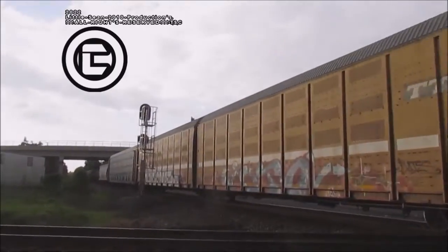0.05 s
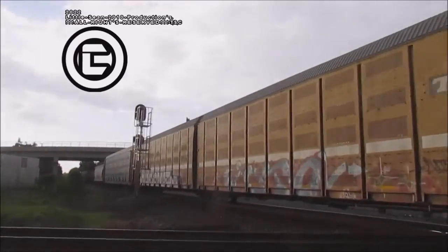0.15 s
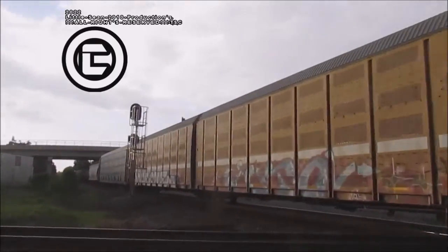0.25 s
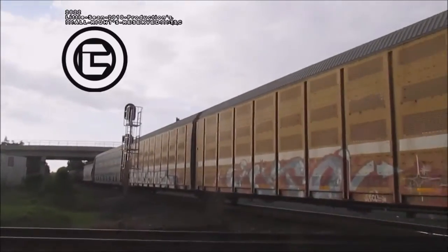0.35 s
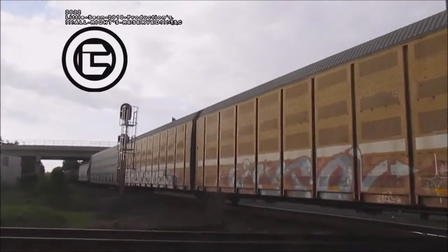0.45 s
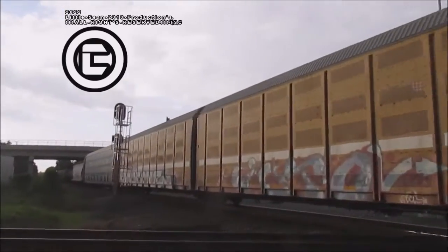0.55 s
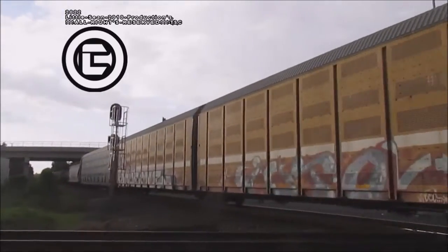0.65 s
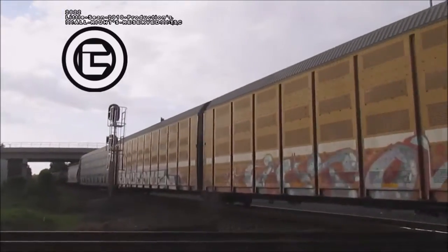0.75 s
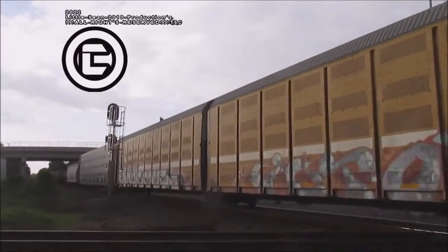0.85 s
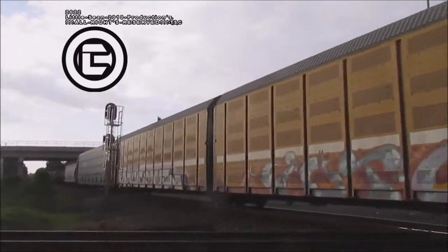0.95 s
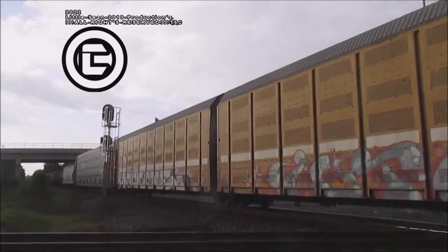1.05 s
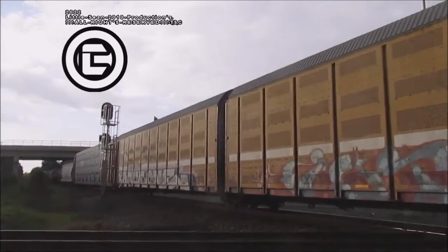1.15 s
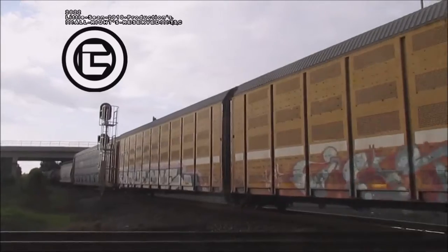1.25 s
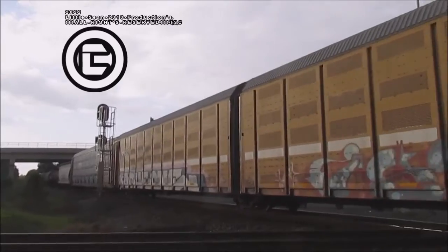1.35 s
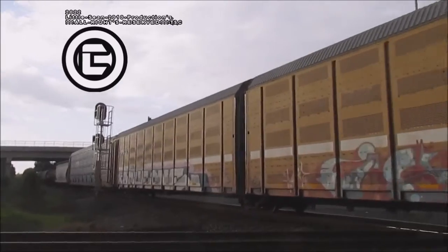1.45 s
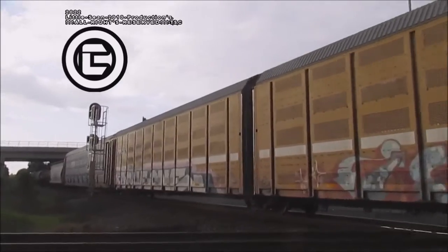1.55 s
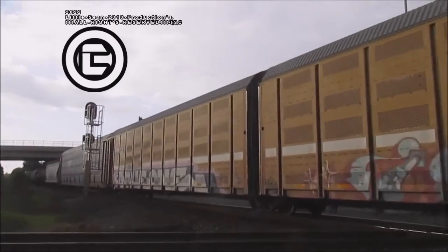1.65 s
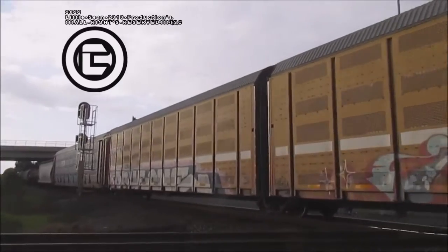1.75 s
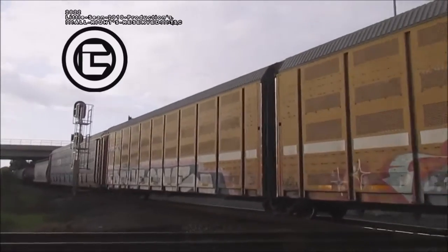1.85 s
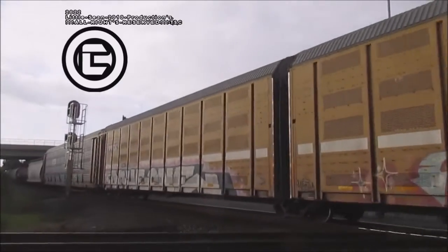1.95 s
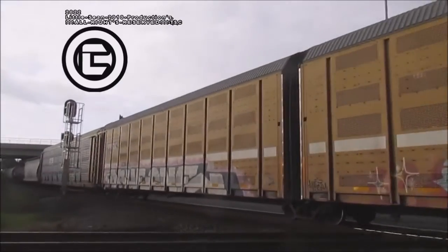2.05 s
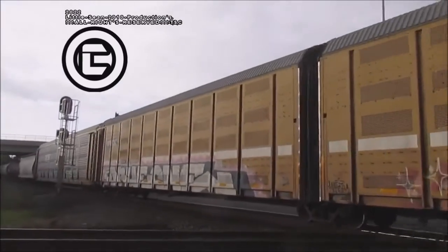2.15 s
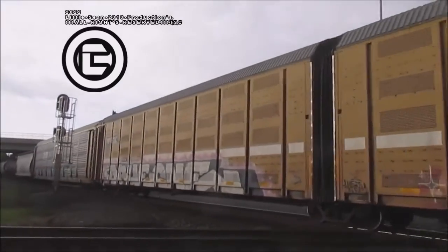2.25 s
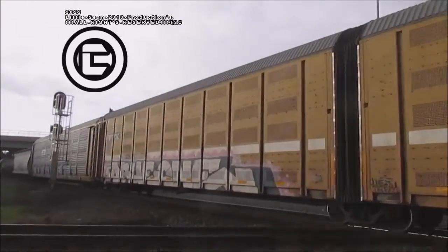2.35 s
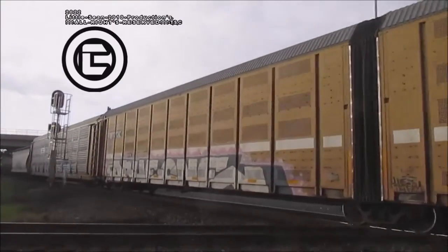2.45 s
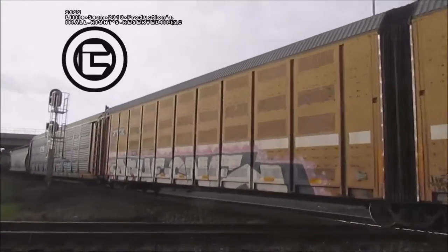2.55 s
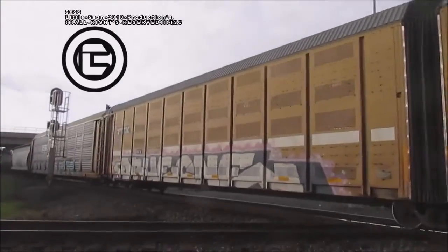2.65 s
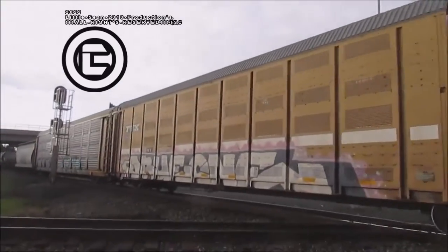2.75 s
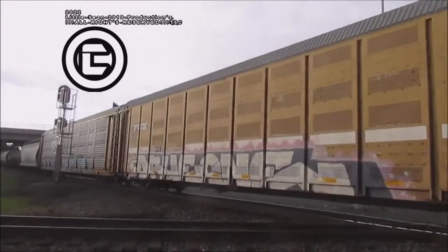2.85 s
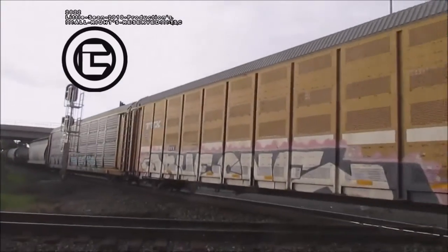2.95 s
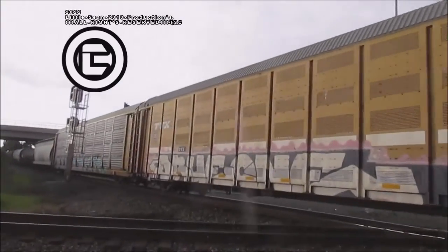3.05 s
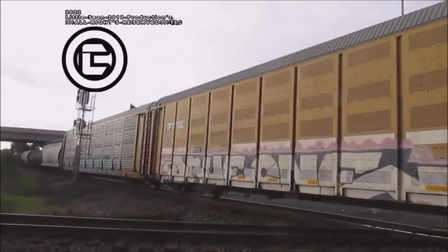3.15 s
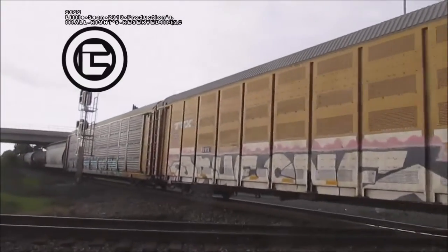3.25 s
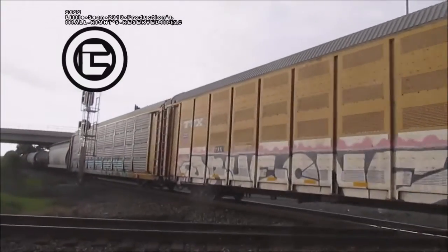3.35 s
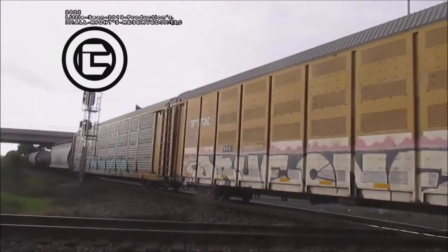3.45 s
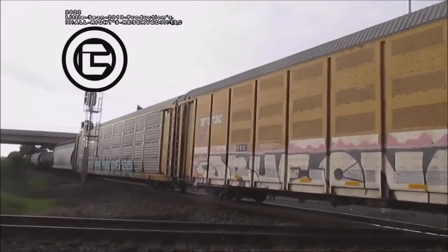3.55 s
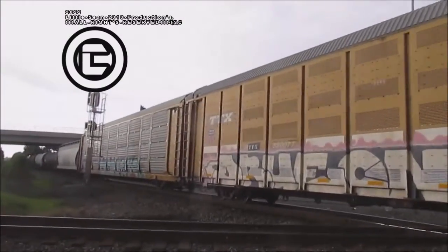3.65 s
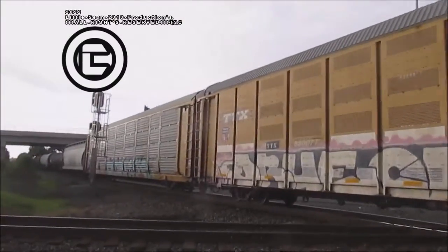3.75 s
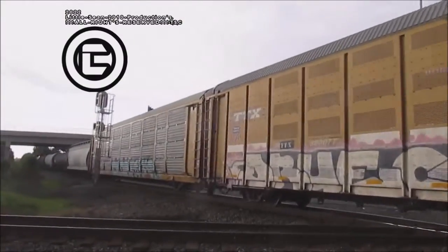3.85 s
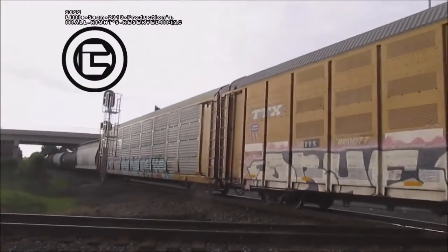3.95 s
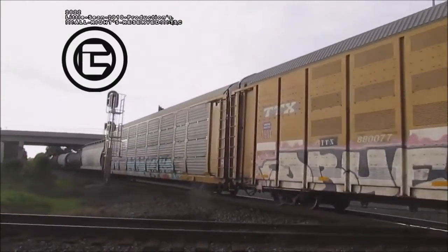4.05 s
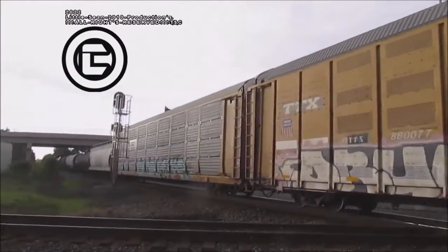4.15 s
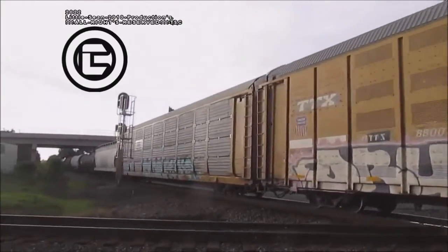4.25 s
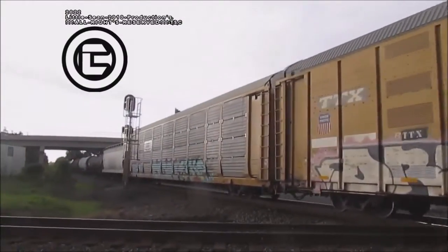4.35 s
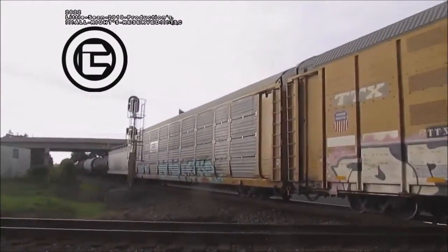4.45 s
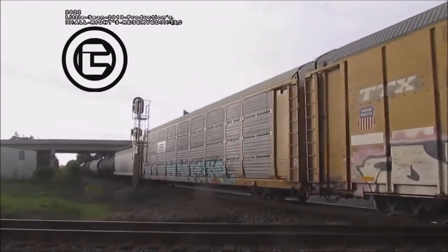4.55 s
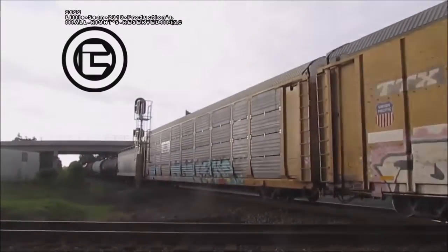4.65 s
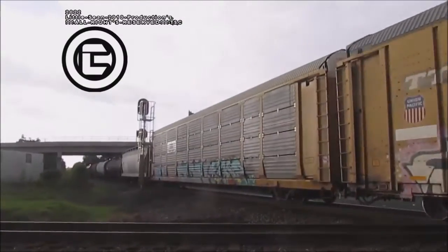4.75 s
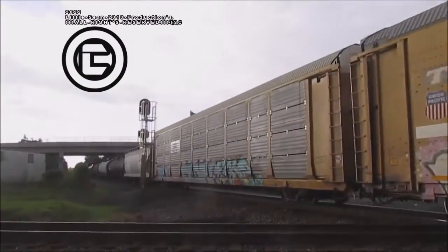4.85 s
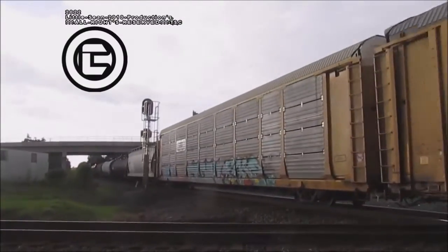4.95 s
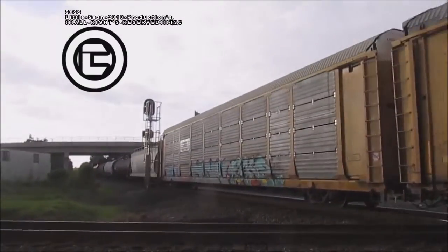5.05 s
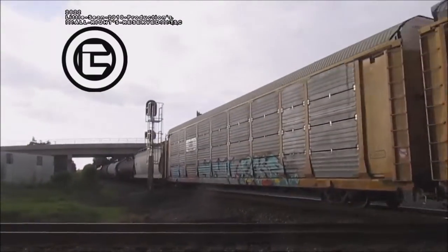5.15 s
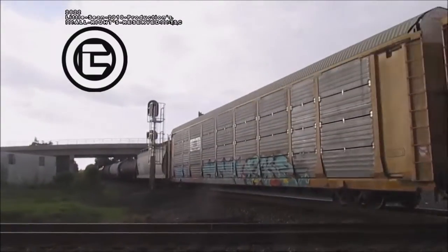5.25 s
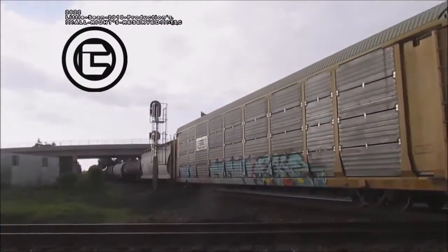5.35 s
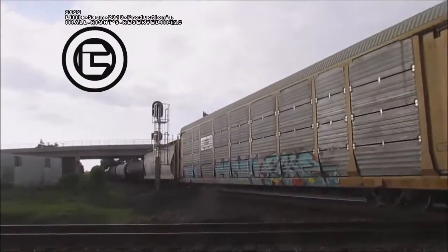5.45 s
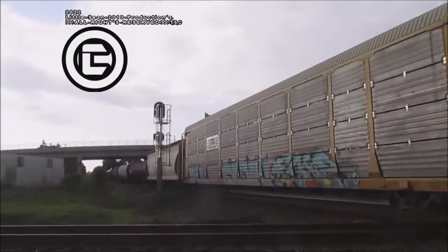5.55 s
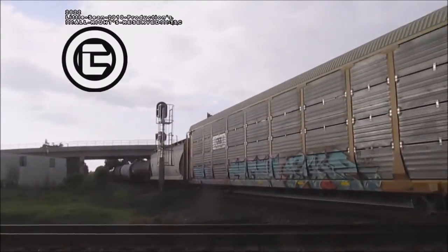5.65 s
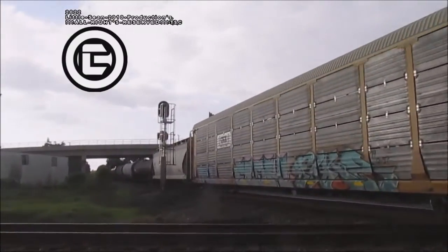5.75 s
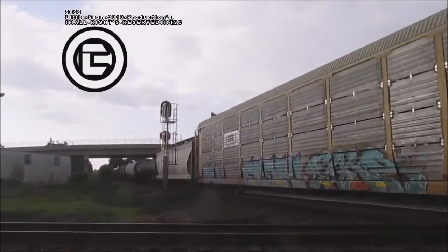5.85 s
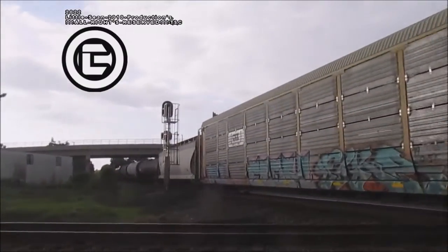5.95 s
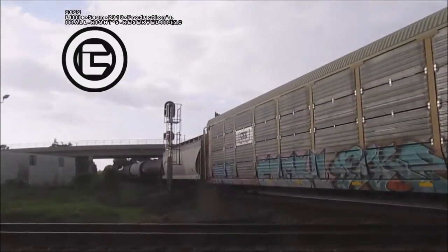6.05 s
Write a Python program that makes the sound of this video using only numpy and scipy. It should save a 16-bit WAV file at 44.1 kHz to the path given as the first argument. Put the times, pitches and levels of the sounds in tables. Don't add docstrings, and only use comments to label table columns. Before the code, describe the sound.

Outdoors beside the track, a freight train rolls past a few metres away. A dense burst of wheel bangs and steel clatter opens, drops to a soft low rumble with faint rattles, then a second burst hits, another lull, and a longer third burst that continues to the end. Thin high squeals and hiss edge the bursts. Close stereo microphone, dry, slightly overloaded, with a dull short bounce from the ballast.

```python
import sys
import numpy as np
from scipy import signal
from scipy.io import wavfile

SR = 44100
rng = np.random.default_rng(int(sys.argv[2]) if len(sys.argv) > 2 else 0)


def ratio(d):
    e = np.asarray(d, float) / 20
    return 10 ** e


def wav_out(sig):
    wavfile.write(sys.argv[1], SR, np.round(np.clip(np.atleast_2d(sig).T, -1, 1) * 32767).astype(np.int16))


N = 269010

LEFT_RIGHT = np.array([[1], [-1]])

# (frequency [Hz], density [dB per Hz])
STEEL_COLOUR = [(20, -8), (98, -1.5), (186, 0), (290, 1.5), (400, -13), (680, -6.5), (1000, -10.5),
                (1300, -14), (1600, -14), (2930, -13.5), (7000, -17.5), (10000, -9), (13000, -12.5),
                (15600, -36)]
# (time [s], clang [dB], thud [dB], rattle [dB], fizz [dB], ring time [s], rise time [s])
AXLE_BLOWS = [(0.003, -21, -8, -15, -36, 0.13, 0.006), (0.097, -12, -23, -19, -22.5, 0.34, 0.0044),
              (0.19, -13.5, -11, -11, -15, 0.26, 0.0064), (0.218, -12.5, -14, -18, -16.5, 0.24, 0.0046),
              (0.299, -15, -15, -22, -19, 0.32, 0.0055), (0.332, -9, -18, -36, -24, 0.2, 0.0039),
              (0.423, -13, -10.5, -14.5, -18.5, 0.25, 0.0032),
              (0.523, -12.5, -13.5, -16, -15, 0.26, 0.0071), (0.553, -15.5, -12.5, -37, -35, 0.22, 0.0033),
              (0.718, -45, -34, -35, -30, 0.16, 0.006), (0.879, -42, -34, -33.5, -38, 0.22, 0.006),
              (1.243, -35, -32, -50, -60, 0.23, 0.006), (1.813, -38, -28, -41, -34.5, 0.36, 0.006),
              (1.929, -54, -45, -51, -32, 0.16, 0.006), (2.049, -32, -22.5, -31.5, -38, 0.27, 0.0048),
              (2.183, -30.5, -15.5, -20, -27, 0.24, 0.0032), (2.257, -27, -19.5, -15, -21, 0.18, 0.006),
              (2.329, -12, -12.5, -11.5, -15, 0.25, 0.0033), (2.431, -14.5, -13, -18, -29, 0.29, 0.0066),
              (2.541, -11, -6, -12, -13, 0.23, 0.0077), (2.564, -9.5, -24, -30, -26, 0.27, 0.0053),
              (2.641, -10.5, -12.5, -15, -15, 0.27, 0.0047), (2.687, -15, -24, -15.5, -33, 0.23, 0.0053),
              (2.767, -13, -14, -13.5, -18, 0.24, 0.006), (2.868, -11.5, -35, -16, -30, 0.28, 0.006),
              (2.898, -20.5, -38, -18, -33, 0.45, 0.0068), (3.059, -29, -32, -49, -22, 0.14, 0.0047),
              (3.238, -31, -12, -34, -29, 0.31, 0.0045), (3.648, -35, -16, -46, -54, 0.16, 0.0041),
              (3.827, -56, -50, -33, -33, 0.21, 0.0055), (4.158, -35, -39, -31, -31, 0.18, 0.005),
              (4.34, -25, -25, -37, -47, 0.27, 0.007), (4.4, -24, -17, -27, -30.5, 0.3, 0.0068),
              (4.569, -21, -32, -27, -44, 0.2, 0.006), (4.591, -35, -28, -34, -19, 0.15, 0.0076),
              (4.61, -26, -34, -15, -10.5, 0.24, 0.0047), (4.684, -15, -3, -15, -25, 0.15, 0.0074),
              (4.702, -7, -31, -12, -21, 0.21, 0.0039), (4.809, -13, -29, -20, -24, 0.2, 0.0073),
              (4.91, -13, -8.5, -9.5, -10, 0.21, 0.0047), (4.941, -11.5, -8, -11, -20, 0.21, 0.0055),
              (5.022, -10, -13, -10, -15.5, 0.23, 0.0052), (5.057, -11.5, -22, -15, -16, 0.23, 0.008),
              (5.146, -15.5, -12, -13, -17.5, 0.33, 0.0068), (5.255, -11.5, -18, -20, -17.5, 0.32, 0.0064),
              (5.284, -29, -19, -13, -19, 0.19, 0.0054), (5.563, -36, -24, -34, -22, 0.2, 0.006),
              (5.631, -23, -29, -37, -28, 0.32, 0.0089), (5.693, -28, -33, -22, -31, 0.23, 0.0066),
              (5.729, -22, -23, -22, -10, 0.38, 0.006), (5.773, -11, -20, -10, -10, 0.28, 0.006),
              (5.882, -8.5, -18.5, -15, -24, 0.22, 0.005), (5.992, -8.5, -10.5, -12, -8, 0.2, 0.0049),
              (6.018, -19, -11.5, -16, -14, 0.27, 0.0081), (6.089, -10, -36, -15, -20, 0.25, 0.006)]


def rms_one(x):
    return x / np.sqrt(np.mean(x ** 2) + 1e-20)


def at_hz(points, hz):
    table = np.array(points)
    return np.interp(np.log(hz), np.log(table[:, 0]), table[:, 1])


def across(centres, columns, hz):
    order = np.argsort(centres)
    place = np.interp(np.log(hz), np.log(np.array(centres)[order]), np.arange(len(centres)))
    low = min(int(place), len(centres) - 2)
    return (low + 1 - place) * columns[order[low]] + (place - low) * columns[order[low + 1]]


def drift(rate):
    r = np.exp(-80 * np.pi * rate / SR)
    noise = rng.standard_normal(N // 40 + 2002)
    slow = signal.lfilter([1], [1, -2 * r, r * r], noise)[2000:]
    return np.interp(np.arange(N) / 40, np.arange(len(slow)), rms_one(slow))


def resonance(x, hz, width_hz):
    r = np.exp(-np.pi * width_hz / SR)
    poles = [1, -2 * r * np.cos(2 * np.pi * hz / SR), r * r]
    return signal.lfilter([(1 - r * r) / 2, 0, (r * r - 1) / 2], poles, x)


def steel_noise(level_at, grain):
    # (frequency [Hz], correlation [0-1])
    likeness = [(30, .85), (100, .92), (300, .94), (1000, .84), (2500, .8), (5000, .64), (14000, .48)]
    # (frequency [Hz], left over right [dB])
    ports = [(60, 2), (150, 4.5), (380, 1.5), (950, 1), (2380, -0.5), (5980, -0.5), (15000, 5.5)]
    out, edges = 0, np.geomspace(20, 16500, 27)
    white = rng.standard_normal((2, 2, N)) * grain
    for k, (low, high) in enumerate(zip(edges, edges[1:])):
        band = signal.butter(2, [low, high], "band", fs=SR, output="sos")
        mid, side = signal.sosfilt(band, white[k % 2])
        hz = np.sqrt(low * high)
        alike = np.clip(at_hz(likeness, hz), 0, 1)
        lean = ratio(at_hz(ports, hz) / 2 * LEFT_RIGHT)
        gain = ratio(at_hz(STEEL_COLOUR, hz)) * level_at(hz)
        out = out + gain * lean * (np.sqrt(1 + alike) * mid + np.sqrt(1 - alike) * side * LEFT_RIGHT)
    return out


def colour_db(centres):
    return [at_hz(STEEL_COLOUR, hz) + 10 * np.log10(hz * 1.92 / SR) for hz in centres]


def rolling(shared_db, own_db):
    # (time [s], rumble [dB], drone [dB], rail hiss [dB], flange hiss [dB])
    roll = [(0.0, -32, -23, -26, -28), (0.13, -29.5, -43, -35.5, -42), (0.32, -32, -33, -28, -34.5),
            (0.44, -29.5, -34.5, -36, -41), (0.63, -34, -38, -37.5, -40.5), (0.88, -35, -44, -53, -51),
            (1.24, -37, -47, -52.5, -55.5), (1.65, -39.5, -46.5, -55.5, -65.5),
            (1.85, -40, -46.5, -55.5, -61), (1.97, -34.5, -43.5, -50.5, -59),
            (2.12, -39.5, -41, -49.5, -51), (2.24, -36, -39.5, -34, -42), (2.36, -29, -38, -28.5, -33),
            (2.41, -35.5, -30, -27, -32), (2.5, -30, -29.5, -24.5, -31), (2.56, -29.5, -32.5, -24, -31),
            (2.8, -33, -29, -33, -32), (2.89, -26.5, -34, -28.5, -28), (3.01, -31, -34.5, -37.5, -32.5),
            (3.26, -34.5, -42.5, -43, -41.5), (3.69, -33.5, -43.5, -46, -50),
            (3.91, -37, -43, -48.5, -56.5), (4.15, -34.5, -42.5, -47.5, -54.5),
            (4.28, -35, -37.5, -41.5, -48.5), (4.55, -35, -38.5, -46.5, -55),
            (4.66, -26.5, -35.5, -25, -29), (4.77, -27, -30.5, -26, -33), (4.84, -26, -28.5, -29.5, -32),
            (4.94, -33.5, -28, -26.5, -29.5), (5.13, -27.5, -29, -28.5, -31.5),
            (5.25, -31, -34.5, -29.5, -35.5), (5.39, -28, -32, -32.5, -35),
            (5.54, -31.5, -37.5, -40.5, -43), (5.74, -30.5, -35, -36, -34), (5.88, -31, -34, -30, -28),
            (5.96, -29, -29.5, -30, -27.5), (6.1, -37, -33, -30, -27.5)]
    centres = [110, 800, 4000, 11000]
    # (frequency [Hz], level [dB])
    tint = [(30, 0.5), (200, -1), (400, 2.5), (700, -1.5), (1500, 2), (13000, 1.5), (15500, -3)]
    s, *columns = np.transpose(roll)
    levels = [np.interp(np.arange(N) / SR, s, c) - ref for c, ref in zip(columns, colour_db(centres))]
    shudder = shared_db * drift(11.0)

    def level_at(hz):
        depth = min(hz / 1500, 1) ** 0.26
        wander = (shudder + own_db * drift(12.4)) * depth
        return ratio(across(centres, levels, hz) + at_hz(tint, hz) + wander)
    return steel_noise(level_at, grain=0.97)


def squeals(bite_s, flicker_db):
    # (start [s], end [s], frequency [Hz], width [Hz], level [dB], left over right [dB])
    flange_squeals = [(0.0, .2, 12200, 60, -43, 0), (.01, .09, 2955, 36, -32, -8),
                      (0.0, .08, 3500, 80, -39, -11), (.55, .98, 11250, 800, -41, 4),
                      (.19, .27, 562, 58, -24, 0), (.31, .41, 745, 50, -23, 3),
                      (.53, .72, 672, 71, -28.5, 2), (.53, .66, 270, 50, -22.5, -0.5),
                      (2.34, 2.44, 1995, 95, -29.5, -3), (2.34, 2.44, 4000, 60, -39, 0),
                      (5.7, 5.84, 6000, 60, -35, 0), (5.96, 6.2, 200, 71, -25.5, -2),
                      (1.296, 1.55, 12000, 38, -66, -2), (1.998, 2.17, 11400, 1000, -49, 4),
                      (2.18, 2.45, 9250, 67, -42, 9), (2.18, 2.7, 12700, 7200, -31, 3),
                      (2.255, 2.4, 2960, 20, -29.5, -15), (2.23, 2.3, 5500, 1100, -28.5, 4),
                      (2.3, 2.44, 6060, 54, -36, 4), (2.24, 2.35, 13200, 100, -44, 0),
                      (2.42, 2.6, 13400, 100, -37, 0), (2.5, 2.64, 3010, 50, -29, -6),
                      (2.7, 2.92, 3250, 69, -31, 0), (2.5, 2.72, 11080, 85, -31, 6),
                      (2.521, 2.7, 10230, 68, -28.5, 0), (2.55, 2.72, 9160, 40, -33, 0),
                      (4.26, 4.62, 10200, 1200, -50, 0), (4.335, 4.38, 1303, 55, -33.5, 2),
                      (4.4, 4.44, 1310, 35, -33, 0), (4.4, 4.44, 1770, 60, -36, 0),
                      (4.575, 4.62, 3190, 35, -36.5, -10), (4.6, 4.66, 1400, 51, -28, 3),
                      (4.6, 4.7, 1803, 80, -27, 0), (4.62, 4.7, 3820, 40, -29, 0),
                      (4.6, 4.9, 9600, 1500, -28, 10), (4.61, 4.78, 8300, 250, -40, 13),
                      (4.61, 4.76, 9600, 100, -38, -2), (4.61, 4.76, 9905, 160, -27, 3),
                      (5.38, 5.62, 9900, 1000, -37.5, -3), (5.42, 5.7, 6640, 1200, -39, 6),
                      (5.63, 5.7, 14200, 1700, -41, -9), (5.69, 5.84, 3045, 34, -32.5, 0),
                      (5.69, 5.84, 2060, 66, -32, -3), (5.69, 6.0, 10200, 11000, -28.5, -9),
                      (5.69, 5.84, 8980, 60, -35, 10), (5.696, 5.87, 10370, 120, -26.5, 4),
                      (5.69, 5.76, 12190, 50, -34, -3), (5.684, 5.897, 6900, 200, -37, 5),
                      (5.952, 6.2, 11230, 80, -30, 0), (5.756, 6.2, 10700, 60, -42, -10)]
    out, flicker = np.zeros((2, N)), ratio(flicker_db * drift(43.0))
    for k, (start, end, hz, width_hz, db, pan_db) in enumerate(flange_squeals):
        first, last = max(int(start * SR), 0), int(end * SR)
        run_in = rng.standard_normal((2, SR // 2 + 6000))[:, :last - first + 3000]
        rung = resonance(resonance(run_in, hz, width_hz), hz, width_hz)
        mid, side = rung[:, 3000:]
        t = np.arange(last - first) / SR
        fade = np.clip((t[-1] - t) / (0.64 * t[-1]), 0, 1)
        shimmer = np.roll(flicker, 5000 * k)[:len(t)] ** min(width_hz / 300, 1)
        grip = np.minimum(t / bite_s, 1) * fade * shimmer
        mid = mid / (np.abs(signal.hilbert(mid)) + 1e-9) ** np.exp(-width_hz / 150)
        side = side * np.std(mid) / np.std(side)
        tone = grip * rms_one(mid + 0.87 * side * LEFT_RIGHT) * ratio(db + pan_db / 2 * LEFT_RIGHT)
        out[:, first:last] += tone[:, :N - first]
    return out


def drops(level_db):
    # (time [s], peak [dB], frequency [Hz], t60 [s])
    wheel_drops = [(0.002, -3.5, 206, 0.05), (0.102, -12, 145, 0.05), (0.218, -3, 102, 0.054),
                   (0.323, -4, 293, 0.05), (2.327, -1, 186, 0.058), (2.421, -4.5, 128, 0.092),
                   (2.867, -6.5, 651, 0.091), (4.684, -6, 129, 0.06), (4.703, -3, 186, 0.059),
                   (4.798, -6, 108, 0.041), (4.938, -6, 188, 0.07), (5.148, -3, 161, 0.035),
                   (5.772, -6.5, 199, 0.068), (5.895, -5, 218, 0.083), (6.014, -9, 197, 0.057)]
    out, t = np.zeros(N + SR // 4), np.arange(SR // 4) / SR
    for start, db, hz, t60 in wheel_drops:
        first = int(start * SR)
        decay = ratio(db + level_db - 60 * t / max(t60, .01))
        out[first:first + len(t)] -= decay * np.sin(2 * np.pi * hz * t)
    return out[:N]


def clatter(treble_fade, grain_db, level_db, low_cut_hz, top_hz):
    centres = [800, 130, 4000, 11000]
    s, *columns, ring_s, rise_s = np.transpose(AXLE_BLOWS)
    levels = [c - ref + level_db for c, ref in zip(columns, colour_db(centres))]
    step = 16
    t = np.arange(SR // 2 // step) * step / SR
    starts = (s * SR / step).astype(int)

    def level_at(hz):
        power = np.zeros(N // step + len(t) + 1)
        stretch = (hz / 1000) ** -treble_fade
        edge_loss = (1 + (low_cut_hz / hz) ** 2) * (1 + (hz / top_hz) ** 4)
        band_db = across(centres, levels, hz) - 10 * np.log10(edge_loss)
        for start, db, ring, rise in zip(starts, band_db, ring_s, rise_s):
            swell = 1 - np.exp(-t / (max(rise, .001) * stretch))
            decay = ratio(db - 60 * t / (max(ring, .03) * stretch))
            power[start:start + len(t)] += (swell * decay) ** 2
        return np.interp(np.arange(N) / step, np.arange(len(power)), np.sqrt(power))
    return steel_noise(level_at, grain=rms_one(ratio(grain_db * drift(225.0))))


def thuds(low_db, high_db, contact_hz):
    # (frequency [Hz], level [dB], t60 [s])
    body = [(77.6, 1, 0.043), (105, -27.5, 0.15), (152.5, -7.5, 0.3), (200, -6, 0.035), (288, -14, .12),
            (597, -19, 0.027), (678, -2, 0.11), (790, -3, .06), (1311, 3.5, 0.054), (2050, -12, 0.03),
            (2380, 4, .05)]
    rows, out = np.array(AXLE_BLOWS), np.zeros(N)
    hits = (rows[:, 0] * SR).astype(int)
    chance = rng.standard_normal((len(rows), len(body)))
    for k, (hz, db, t60) in enumerate(body):
        clicks = np.full(N, 1e-18)
        strength = rows[:, 2] + low_db if hz < 350 else rows[:, 1] + high_db
        clicks[hits] = -ratio(strength + db + 2.5 * chance[:, k])
        r, w = ratio(-60 / (t60 * SR)), 2 * np.pi * hz / SR
        out += signal.lfilter([0, np.sin(w)], [1, -2 * r * np.cos(w), r * r], clicks)
    soft = np.exp(-2 * np.pi * contact_hz / SR)
    return signal.lfilter([1 - soft], [1, -soft], out)


def wheel_ring(x, width_hz, level_db):
    modes_hz = np.linspace(1500, 14800, 30) + rng.uniform(-200, 200, 30)
    ring = sum(resonance(x, hz, width_hz) * ratio(3.5 * drift(4.0)) for hz in modes_hz)
    return x + ratio(level_db) * ring


def ground(x, delay_s, gain, cut_hz):
    bounce = signal.lfilter(*signal.butter(1, cut_hz, fs=SR), x)
    late = [np.interp(np.arange(N) - delay_s * SR, np.arange(N), c) for c in bounce]
    return (x + gain * np.array(late)) / np.sqrt(1 + gain ** 2 / 2)


def far_rattles(level_db, rise_s, ring_s, low_hz, high_hz):
    # (time [s], peak [dB])
    puffs = [(0.6294, -33), (0.9394, -42), (1.0994, -38), (1.4551, -42), (1.5194, -45), (1.8716, -42),
             (2.0794, -31), (2.9694, -23), (3.0194, -18), (3.1194, -31), (3.1894, -25), (3.2894, -25),
             (3.3894, -31), (3.4266, -29), (3.5194, -25.5), (3.6127, -30), (3.7094, -37), (3.7694, -36),
             (3.9094, -38), (4.1094, -36), (5.4494, -24), (5.5064, -26)]
    power, t = np.zeros(N + SR // 4), np.arange(SR // 4) / SR
    for start, db in puffs:
        first = int(start * SR)
        puff = (1 - np.exp(-t / rise_s)) * ratio(db + level_db - 60 * t / ring_s)
        power[first:first + len(t)] += puff ** 2
    band = signal.butter(1, [low_hz, high_hz], "band", fs=SR, output="sos")
    mid, side = signal.sosfilt(band, rng.standard_normal((2, N)))
    return np.sqrt(power[:N]) * rms_one(mid + 1.3 * side * LEFT_RIGHT)


def scene():
    # (time [s], left over right [dB])
    balance = [(0.0, -2), (0.95, -1), (2.05, -2), (2.14, -1), (3.41, 0.5), (3.65, 1.5), (3.89, 0.5),
               (4.03, 1), (4.45, -0.5), (5.86, -0.5), (6.1, 0.5)]
    steel = clatter(treble_fade=.07, grain_db=2.5, level_db=-8, low_cut_hz=77, top_hz=14000)
    steel = wheel_ring(steel, width_hz=34, level_db=4)
    steel = steel + rolling(shared_db=1.38, own_db=1.0)
    steel = steel + thuds(low_db=-14.5, high_db=-13, contact_hz=1500) + drops(level_db=-5)
    mix = ground(steel, delay_s=0.001493, gain=0.33, cut_hz=1140)
    mix = mix + squeals(bite_s=0.0053, flicker_db=2.5)
    mix = mix + far_rattles(level_db=-6.5, rise_s=0.0044, ring_s=0.18, low_hz=3500, high_hz=12000)
    left, right = mix
    lag = 6
    left = np.concatenate([left[:lag], left[:-lag]])
    lean = ratio((np.interp(np.arange(N) / SR, *np.transpose(balance)) - 1.0) / 2)
    return np.array([left * lean, right / lean])


def band_limit(x):
    return signal.sosfilt(signal.butter(12, 15760, fs=SR, output="sos"), x)


def record(dry):
    notched = dry - resonance(dry, hz=7850, width_hz=200)
    rounded = 1.283 * np.tanh(notched / 1.313)
    top_cut = signal.cheby2(10, 60, 16700, fs=SR, output="sos")
    return band_limit(signal.sosfilt(top_cut, rounded))


dry = scene()
out = record(dry)
wav_out(out)
```